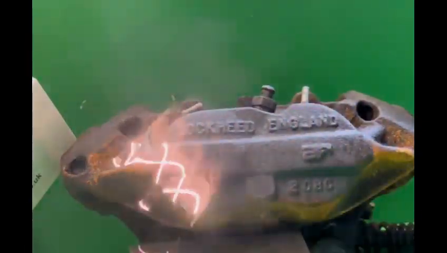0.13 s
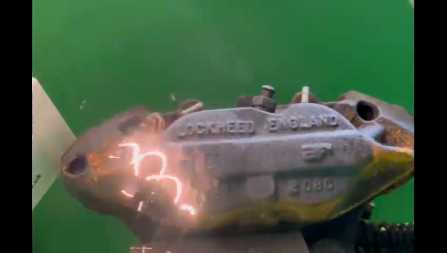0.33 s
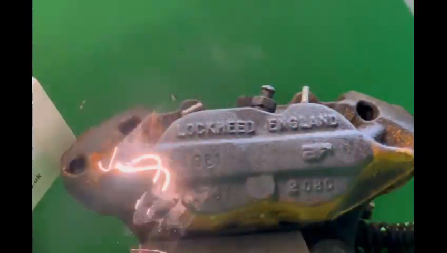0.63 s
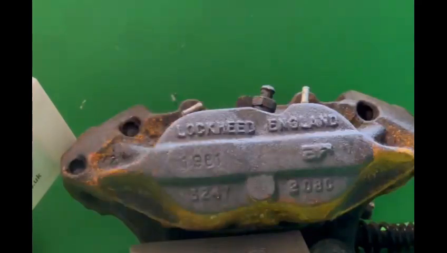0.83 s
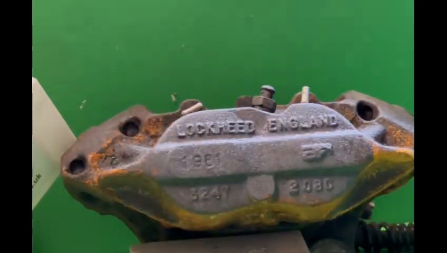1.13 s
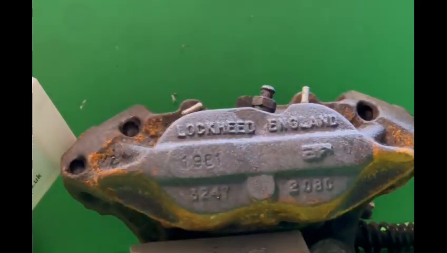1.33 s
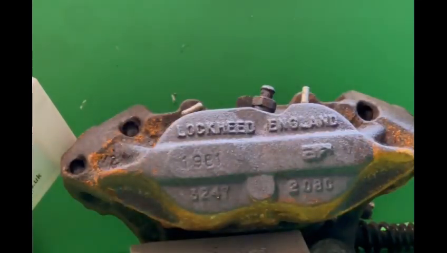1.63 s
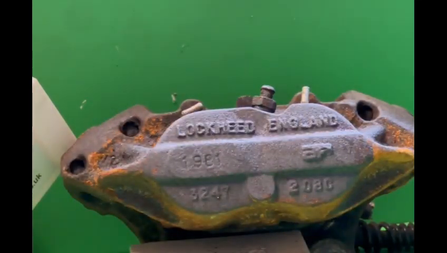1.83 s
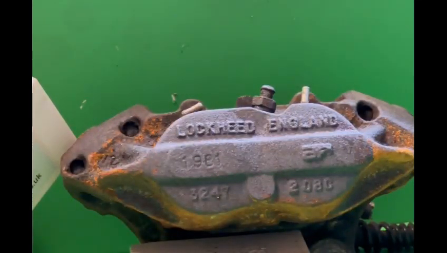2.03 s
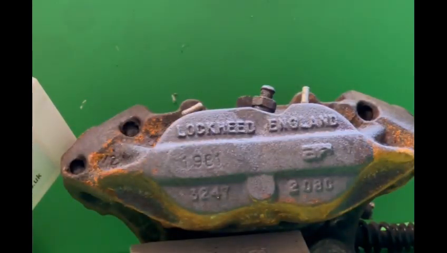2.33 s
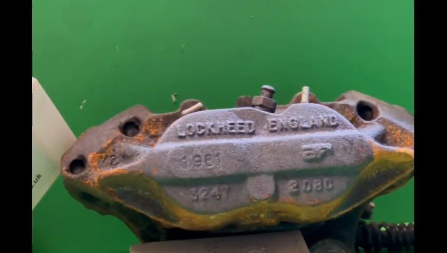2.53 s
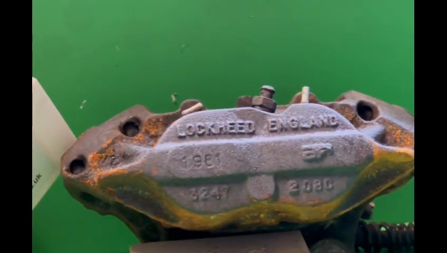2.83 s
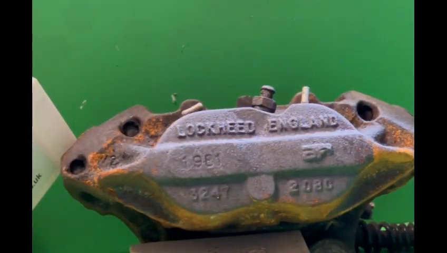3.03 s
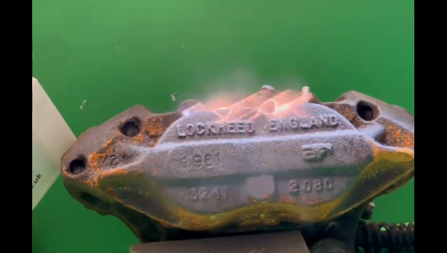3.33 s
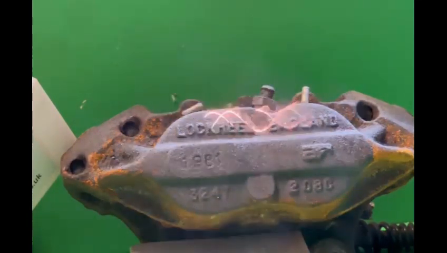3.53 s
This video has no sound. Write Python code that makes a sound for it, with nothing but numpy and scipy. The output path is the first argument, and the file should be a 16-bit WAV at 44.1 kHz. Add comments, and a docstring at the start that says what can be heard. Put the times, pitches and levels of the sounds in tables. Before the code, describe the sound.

A laser cleaner buzzes and sizzles on rusty iron from the start until about 0.8 seconds, with a few soft low puffs from 0.5 seconds as flakes burn off. Its cooling fan whines steadily throughout over rushing extraction air, and these carry on alone through the middle. At about 3.2 seconds the laser sizzles again with tiny bright spark snaps, fading after 3.5 seconds.

```python
"""A buzzing sizzle over a steady whine: a laser cleaner strips rust from an iron casting in a workshop.
The beam sweeps to and fro on the broad face, and a few flakes burn off with a low puff.
Near the end it fires again, briefly, on the top edge, with small snapping sparks.
Its cooling fan whines throughout, over the rush of extraction air.
The microphone's two ports give left and right; puffs and sparks sit in the centre."""
import sys
import numpy as np
from scipy import signal
from scipy.fft import rfft, irfft
from scipy.io import wavfile
from scipy.ndimage import uniform_filter1d

SR = 44100
rng = np.random.default_rng(int(sys.argv[2]) if len(sys.argv) > 2 else 0)


def store_pcm(level_fs):
    """Save levels as 16-bit WAV."""
    pcm = np.round(np.clip(level_fs, -1, 1) * 32767).astype(np.int16)
    wavfile.write(sys.argv[1], SR, np.atleast_2d(pcm).T)


N = 161847
T = np.arange(N) / SR
HZ = np.fft.rfftfreq(N, 1 / SR)
SWEEP_HZ, RENEW_HZ = 47.5, 2.35  # the beam's to-and-fro rate; how fast the rust pattern changes


def beam_on_face():
    """The first, longer firing, on the casting's broad face."""
    # strength of the firing: time_s, gain_db
    strength = [(0, 1), (.12, -4), (.4, -0.5), (.65, -3), (.78, 0.5), (.815, -21), (.86, -54)]
    # strong low partials of the buzz: sweep_multiple, level_db
    partials = [(4, -42.5), (6, -45), (8, -45.5), (9, -52), (11, -57), (19, -54), (20, -55), (21, -52),
                (22, -55)]
    # spectrum of the burning rust: frequency_hz, density_db
    sizzle = [(60, -73), (130, -66), (300, -74), (550, -73.5), (950, -72.5), (1250, -72.5), (2100, -70.5),
              (2800, -67), (3200, -70.5), (4500, -71), (5800, -67.5), (7000, -68.5), (8700, -65),
              (9700, -74), (10500, -112.5)]
    return beam(strength, partials, sizzle, repeat_share=0.84, throb=0.16)


def beam_on_edge():
    """The second, short firing, on the top edge."""
    # strength of the firing: time_s, gain_db
    strength = [(3.21, -50), (3.224, -10), (3.238, -1), (3.33, -.8), (3.44, 0.7), (3.487, -2), (3.525, -10),
                (3.67, -20)]
    # strong low partials of the buzz: sweep_multiple, level_db
    partials = [(6, -53), (8, -42), (9, -43.5), (10, -53), (11, -46.5), (13, -53), (14, -50.5), (15, -50),
                (18, -55)]
    # spectrum of the burning rust: frequency_hz, density_db
    sizzle = [(200, -93.5), (550, -77.5), (1100, -78.5), (1600, -72.5), (1880, -62), (2350, -64.5),
              (2600, -73.5), (2820, -63), (3050, -73.5), (4500, -70), (5600, -66), (7000, -70.5),
              (8600, -64.5), (9500, -76.5), (10500, -94)]
    return beam(strength, partials, sizzle, repeat_share=0.75, throb=0.3)


def beam(strength, partials, sizzle, repeat_share, throb, waver=0.2):
    """One firing: a buzz at the sweep rate and a sizzle that flares twice in each sweep."""
    angle = 2 * np.pi * SWEEP_HZ * T
    flare = np.exp(throb * np.cos(2 * angle))
    repeated, fresh = np.sqrt(repeat_share), np.sqrt(1 - repeat_share)
    first, second = [flare * (repeated * retrace() + fresh * unit(spatter())) for _ in range(2)]
    buzz = np.zeros(N)
    for multiple, db in partials:
        tone = np.exp(1j * (round(multiple) * angle + 2 * np.pi * rng.random()))
        flutter = unit(1 + waver * wander(RENEW_HZ))
        buzz += np.sqrt(2) * amp(db) * (flutter * tone).real
    return (microphone(first, second, sizzle) + buzz) * amp(curve(strength))


def retrace():
    """Each sweep crosses nearly the same rust, so its pattern repeats and only slowly renews."""
    period = round(SR / SWEEP_HZ)
    carry_over = np.exp(-2 * np.pi * RENEW_HZ / SWEEP_HZ)
    sweeps = rng.standard_normal((2 * N // period, period))
    return unit(signal.lfilter([1], [1, -carry_over], sweeps, axis=0).ravel()[-N:])


def spatter(grains_per_s=5000, spread_db=3):
    """The fresh part of the sizzle: a dense white train of tiny bursts of uneven size."""
    grains = rng.standard_normal(N) * (rng.random(N) < grains_per_s / SR)
    return grains * amp(spread_db * np.minimum(rng.exponential(1, N), 3))


def puffs():
    """Flakes flash into vapour, each a short low thump that sags in pitch."""
    # flakes burning off: start_s, level_db
    flakes = [(.461, -24), (.579, -24), (.690, -28.5), (.770, -26), (.795, -30)]
    top_hz, low_hz, sag_s = 650, 105, 0.00317
    rise_s, decay_s = 0.0007, 0.013
    out = np.zeros(N)
    for start, db in flakes:
        age = np.maximum(T - start, 0)
        turns = low_hz * age + (top_hz - low_hz) * sag_s * (1 - np.exp(-age / sag_s))
        envelope = (1 - np.exp(-age / rise_s)) * np.exp(-age / decay_s)
        out += amp(db) * envelope * np.sin(2 * np.pi * turns)
    return out


def sparks(decay_s=0.0018, band_hz=(2200, 7000)):
    """Tiny bright snaps as the beam meets and leaves the edge."""
    # single sparks: start_s, level_db
    snaps = [(3.234, -27), (3.2415, -22.5), (3.263, -21), (3.452, -25), (3.473, -23), (3.484, -24)]
    envelope = sum(amp(db) * (T >= start) * np.exp(-abs(T - start) / decay_s) for start, db in snaps)
    band = signal.butter(4, band_hz, "bandpass", fs=SR, output="sos")
    return envelope * unit(signal.sosfilt(band, rng.standard_normal(N)))


def fan(flutter_hz=16, drift_hz=1.1, drift_db=0.55):
    """The cooling fan: partials of the blade rate, fluttering and slowly drifting in turbulent air."""
    # blade rate: time_s, pitch_hz
    blade_rate = [(0, 323.32), (1.45, 323.42), (1.95, 323.84), (2.3, 323.62), (2.8, 323.68), (3.3, 323.33),
                  (3.67, 323.28)]
    # partials of the whine: blade_multiple, level_db, left_minus_right_db, left_lead_rad, unsteady_share
    whine = [(1, -39, -0.5, 1.45, 0.22), (2, -53.5, 4, 0.77, .35), (3, -40.5, 11, 1.52, 0.17),
             (4, -41, -2.5, 1.95, 0.34), (5, -31, -10, -4, 0.2), (6, -40.5, 3.5, -0.06, 0.67),
             (7, -38.5, -1.5, 0.04, 0.08), (8, -29.5, 0.5, 0.32, .06), (9, -45.5, -1.5, 0.47, 0.4),
             (10, -51.5, 6, -2, 0.4), (11, -48.5, -2.5, -1.5, .35), (12, -37.5, 0, .1, 0.17),
             (14, -59, -1, -0.5, .4), (15, -60, -3.5, -2, 0.5), (16, -31, 0, .25, .05),
             (18, -47.5, 2, 0, .35), (20, -51.5, -8, -1.5, .4), (22, -47.5, -1, 2.8, 0.6),
             (24, -36.5, 1, -2, 0.6), (26, -41, -1, 0.3, 0.2), (27, -51.5, -0.5, -1, 0.3),
             (32, -35, -0.5, -2.5, 0.7)]
    # rise and fall of the piercing sixteenth partial: time_s, gain_db
    shrill = [(0, 0.5), (.5, -0.7), (1.1, .5), (1.4, -2.3), (1.7, -2), (1.9, -0.1), (2.6, 0), (3.3, 1.2),
              (3.67, 0)]
    angle = 2 * np.pi * np.cumsum(curve(blade_rate)) / SR
    out = np.zeros((2, N))
    for multiple, db, lean_db, lead, unsteady in whine:
        flutter = unit(1 + unsteady * wander(flutter_hz))
        tone = flutter * np.exp(1j * (round(multiple) * angle + 2 * np.pi * rng.random()))
        drift = curve(shrill) if round(multiple) == 16 else drift_db * wander(drift_hz).real
        ports = unit(np.array([amp(lean_db) * np.exp(1j * lead), 1]))
        out += np.sqrt(2) * amp(db) * (ports[:, None] * tone * unit(amp(drift))).real
    return out


def extraction_air(patch_db=1.42, swell_db=0.4, swell_hz=2.5):
    """The rush behind everything: noise with faint drifting patches and a slow swell."""
    # spectrum of the rushing air: frequency_hz, density_db
    rush = [(15, -102), (30, -88), (50, -69.5), (80, -65), (150, -66), (280, -71), (400, -76), (550, -79.5),
            (630, -72.5), (800, -74.5), (950, -71), (1170, -77), (1350, -71), (1700, -72.5), (1930, -66),
            (2080, -70), (2230, -67), (2450, -69.5), (2850, -71.5), (3050, -76.5), (3300, -67),
            (3750, -75.5), (4000, -73.5), (4400, -71), (4750, -70.5), (5150, -65), (5500, -71.5),
            (5850, -69.5), (6400, -74.5), (7000, -72.5), (7800, -74.5), (8550, -65), (9000, -69),
            (9400, -82), (10500, -102)]
    # slow trend of its level: time_s, gain_db
    trend = [(0, 0), (.8, -0.1), (1.5, -0.15), (2.2, 0), (3, 0.4), (3.67, 0.5)]
    cells = signal.stft(rng.standard_normal((2, N)), nperseg=1024)[2]
    patches = uniform_filter1d(rng.standard_normal(cells.shape[1:]), size=10, axis=0)  # across pitch
    patches = unit(uniform_filter1d(patches, size=4, axis=1))  # across time
    first, second = signal.istft(cells * amp(patch_db * patches))[1][:, :N]
    swell = amp(curve(trend) + swell_db * wander(swell_hz).real)
    return microphone(first, second, rush) * swell


def microphone(first, second, density):
    """Picks up two white sounds at the two ports, partly alike, and gives them one spectrum."""
    # how the ports differ: frequency_hz, left_minus_right_db, left_lead_rad, coherence
    ports = [(120, -1, 0.22, .95), (330, -1, -0.4, 0.83), (515, 0, 0.8, 0.5), (690, -0.5, .2, .6),
             (810, 10, 3, 0.5), (990, 10.5, 2.5, 0.4), (1056, -1, 2, 0.6), (1340, -5.5, -3, .74),
             (1720, -10.5, -3.5, 0.8), (1930, -3.5, -0.1, 0.8), (2150, -1, -0.5, 0.98),
             (2700, .5, .1, 0.96), (3500, 0, -0.5, 1), (6500, 0, 0, 0.98), (8000, 0, 0, 0.98),
             (9500, 0, 0, .9)]
    hz, lean_db, lead, coherence = np.transpose(ports)
    lean = amp(spectrum(np.c_[hz, lean_db]))
    shared = spectrum(np.c_[hz, coherence * np.cos(lead)])
    shared = shared + 1j * spectrum(np.c_[hz, coherence * np.sin(lead)])
    separate = np.sqrt(np.maximum(1 - abs(shared) ** 2, 0))
    right = rfft(unit(first))
    left = lean * (shared * right + separate * rfft(unit(second)))
    mid_gain = np.sqrt(1 + lean ** 2 + 2 * lean * shared.real) / 2
    return irfft(np.array([left, right]) / mid_gain * amp(spectrum(density)) * np.sqrt(SR / 2), N)


def amp(db):
    """Decibels to gain."""
    return 10 ** (np.asarray(db) / 20)


def unit(x):
    """Scales to rms 1."""
    return x / np.sqrt(np.mean(abs(x) ** 2) + 1e-20)


def curve(points):
    """Joins (time_s, value) points by straight lines."""
    return np.interp(T, *np.transpose(points))


def spectrum(points):
    """Joins (frequency_hz, value) points on a log-frequency axis."""
    hz, value = np.transpose(points)
    return np.interp(np.log(HZ + 1), np.log(hz + 1), value)


def wander(rate_hz, size=1024):
    """Slow complex random motion of rms about 1, mostly below rate_hz."""
    hz = np.fft.fftfreq(size, N / SR / size)
    white = rng.standard_normal(size) + 1j * rng.standard_normal(size)
    slow = np.fft.ifft(white / np.sqrt(1 + (hz / rate_hz) ** 4))
    return np.interp(T, np.linspace(0, T[-1], size), unit(slow))


def scene():
    """Two firings of the beam, with fan and air throughout."""
    return beam_on_face() + beam_on_edge() + fan() + extraction_air() + puffs() + sparks()


def record(dry):
    """A narrow dip in the treble, then the band limit."""
    dip_hz, dip_width_hz, dip_db, top_hz = 7440, 213, -47, 10750
    dip = amp(dip_db * np.exp(-((HZ - dip_hz) / dip_width_hz) ** 2))
    lowpass = signal.firwin(511, top_hz, window=("kaiser", 9), fs=SR)
    return signal.oaconvolve(irfft(rfft(dry) * dip, N), lowpass[None], "same")


dry = scene()
out = record(dry)
store_pcm(out)
```